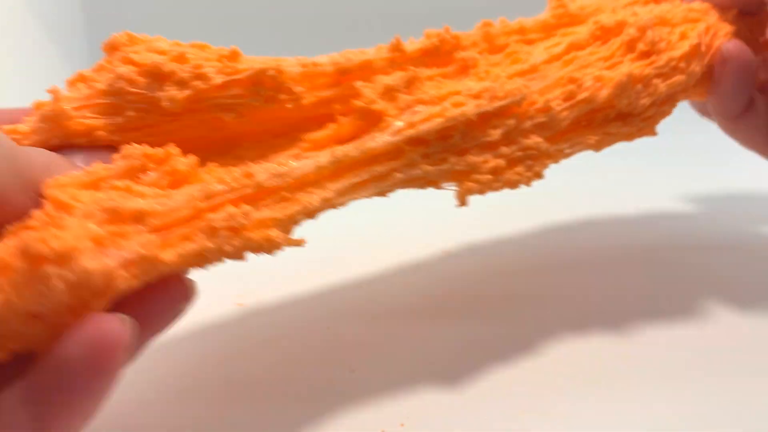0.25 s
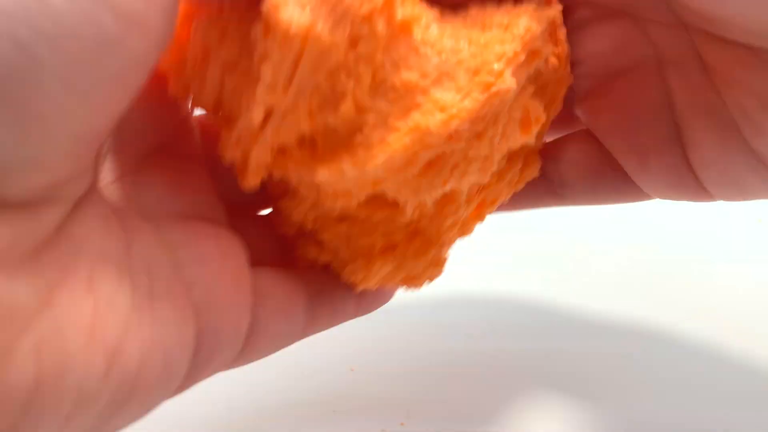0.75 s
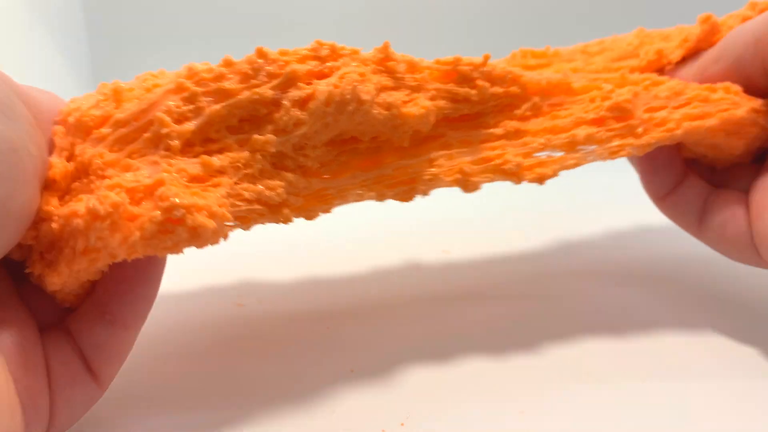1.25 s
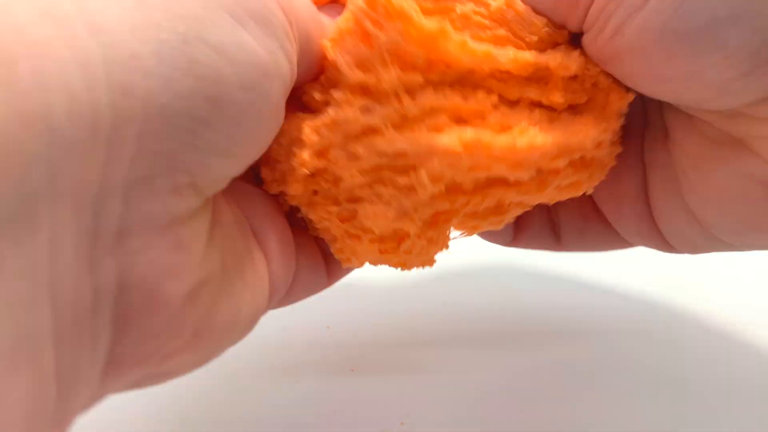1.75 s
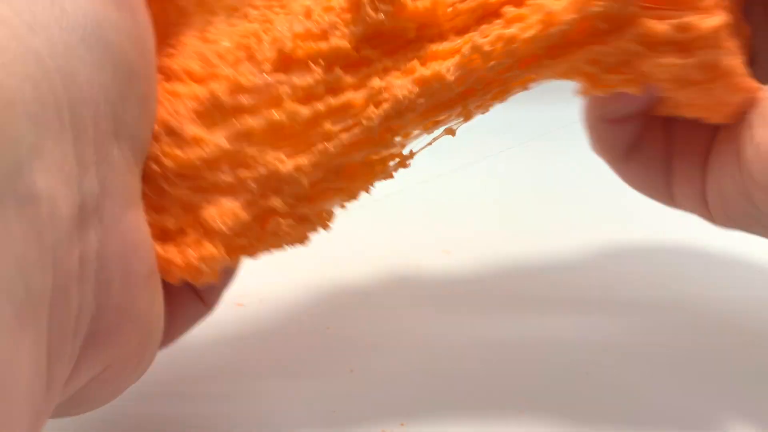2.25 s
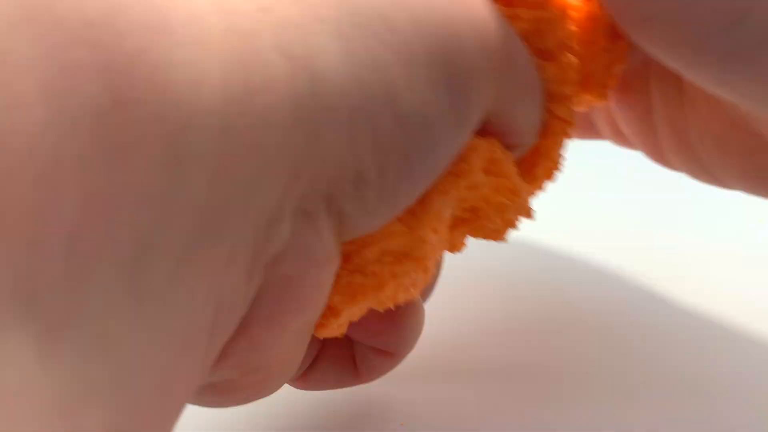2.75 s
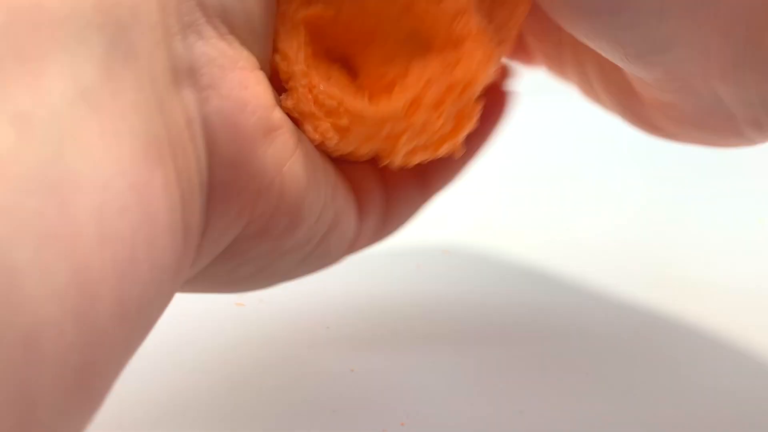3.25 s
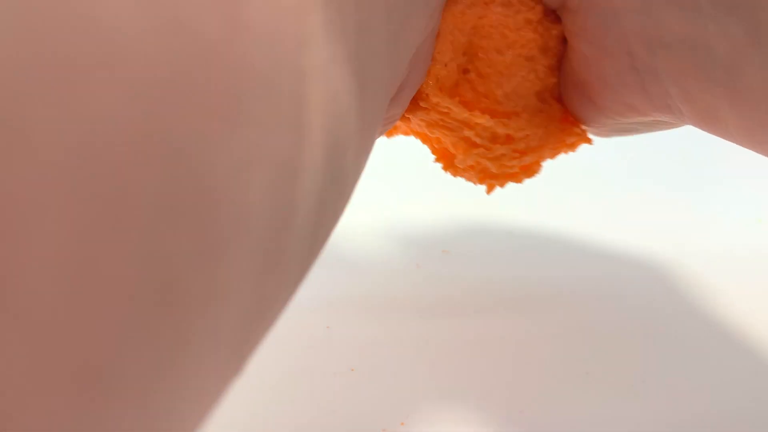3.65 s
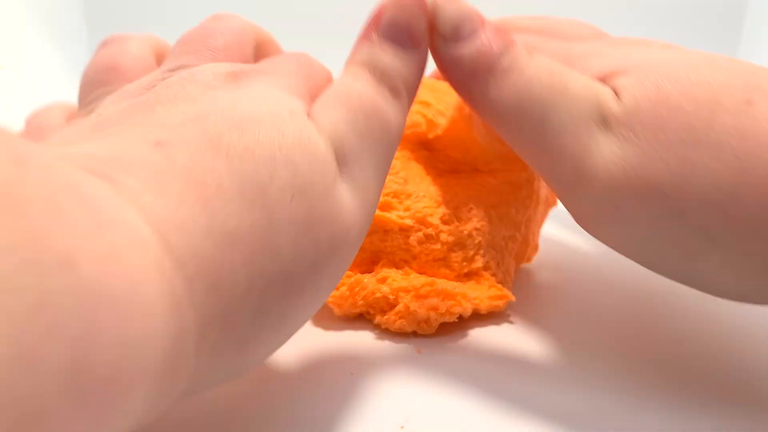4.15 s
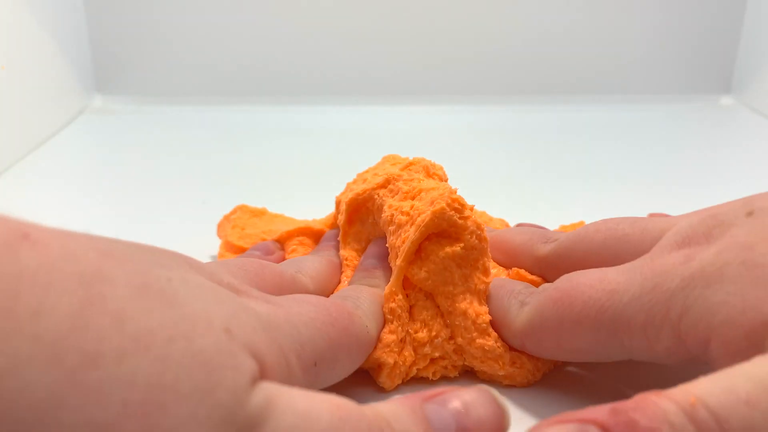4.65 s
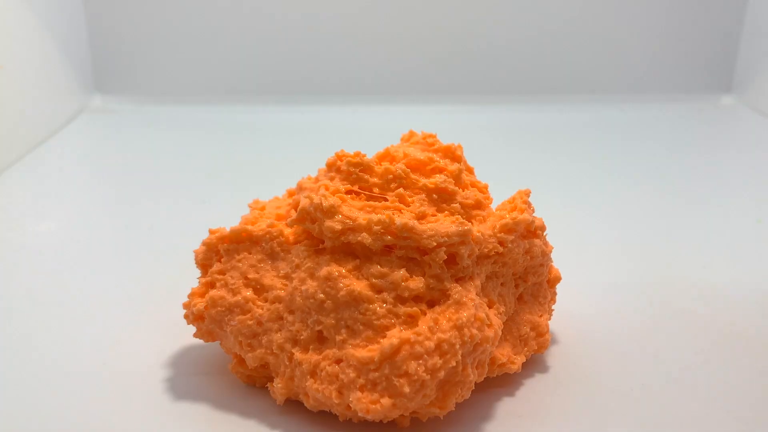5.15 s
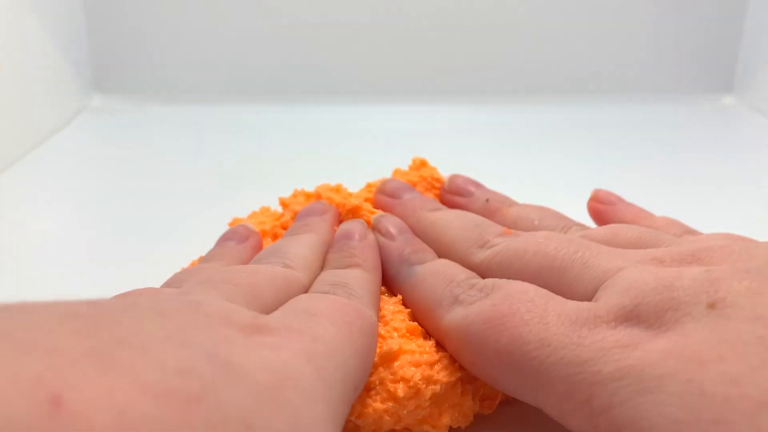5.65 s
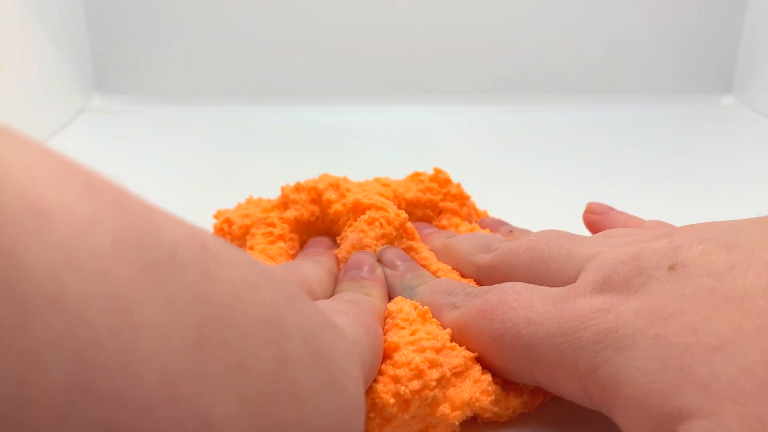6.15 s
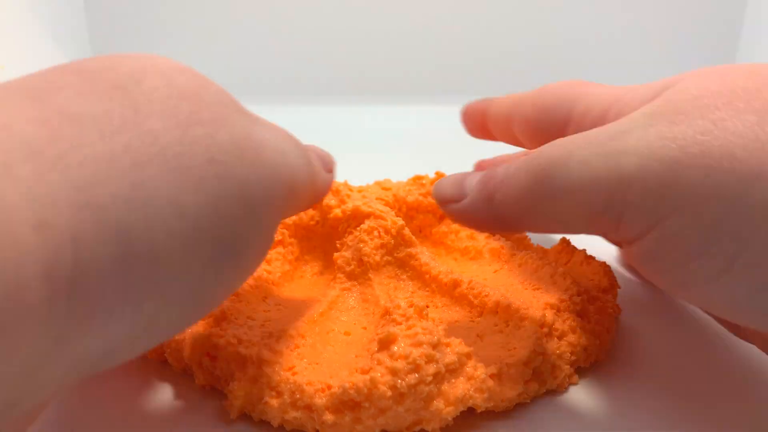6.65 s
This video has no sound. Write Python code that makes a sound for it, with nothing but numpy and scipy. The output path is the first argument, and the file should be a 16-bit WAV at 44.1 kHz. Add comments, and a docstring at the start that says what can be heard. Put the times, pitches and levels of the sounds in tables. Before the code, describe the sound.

Two hands pull, fold and squash crunchy foam-bead slime close to the microphone. Dense tiny crackles with sharp popping pockets swell and fade with each pull, strongest near the middle, where a deep soft thump hits the table. Later presses are wetter and lower, with dull rubbing and knocks, separated by brief quiet pauses. The space is small, dry and slightly boxy, with wide stereo detail.

```python
"""Inside a small box on a table, two hands stretch, fold and press a lump of bead-filled slime, in stereo.
Random snaps, each a short ringing sine, crackle densely; their low band squelches and their top fizzes.
Bigger pockets burst as ragged noise pops. Hands and lump knock and rub the table, whose modes thud.
Shaped noise lies below as a faint hum and hiss; box air, scatter and unlike paths to the sides add space."""
import sys
import numpy as np
from scipy import signal
from scipy.fft import rfft, irfft, next_fast_len
from scipy.io import wavfile

SR = 44100
rng = np.random.default_rng(int(sys.argv[2]) if len(sys.argv) > 2 else 0)


def master(y):
    """Save y as 16-bit WAV."""
    cut = np.clip(np.atleast_2d(y).T, -1, 1)
    pcm = np.round(cut * 32767)  # scale
    wavfile.write(sys.argv[1], SR, pcm.astype(np.int16))


N = 305172   # length in samples
PATHS = 3    # one common to both sides and one for each; same events, unlike fine detail


def amp(db):
    """Gain of a level in dB."""
    return 10 ** (np.asarray(db) / 20)


def rms_one(x):
    """Scale to rms 1."""
    return x / np.sqrt(np.mean(x ** 2) + 1e-20)


def at_hz(points, hz):
    """Read a table of f/Hz and value on a log-frequency axis."""
    table_hz, values = np.transpose(points)
    return np.interp(np.log(hz + 1), np.log(table_hz), values)


def colour(x, points):
    """Filter x by a gain curve of f/Hz and level/dB."""
    gain = amp(at_hz(points, np.fft.rfftfreq(N, 1 / SR)))
    return irfft(rfft(x) * gain, N)


def band(x, lo_hz, hi_hz):
    """Band-pass."""
    return signal.sosfilt(signal.butter(3, [lo_hz, hi_hz], "band", fs=SR, output="sos"), x)


def drift(rate_hz):
    """Random wander of rms 1: noise through two equal low-pass poles."""
    r = np.exp(-2 * np.pi * rate_hz / SR)
    settle = 9000   # samples dropped while the filter settles
    noise = rng.standard_normal(N + settle)
    return rms_one(signal.lfilter([1], [1, -2 * r, r * r], noise)[settle:])


def ring(clicks, hz, t60_s):
    """Two-pole resonator: a unit click sets a decaying sine of starting height 1 ringing."""
    r = amp(-60 / (t60_s * SR))
    w = 2 * np.pi * hz / SR
    return signal.lfilter([0, np.sin(w)], [1, -2 * r * np.cos(w), r * r], clicks + 1e-18)


def swell(peak_s, peak_db, rise_s, fall_s):
    """Level in dB of swells that rise to a peak and fall, 20 dB in the given times; their powers add."""
    t = np.arange(0, N / SR + .004, .002)[:, None]
    rising = (peak_s - t) / np.maximum(rise_s, .004)
    falling = (t - peak_s) / np.maximum(fall_s, .004)
    below = np.where(t < peak_s, rising, falling)
    power = np.sum(amp(peak_db - 20 * below) ** 2, axis=1)
    return np.interp(np.arange(N) / SR, t[:, 0], 10 * np.log10(power + 1e-14))


def joined(a_db, b_db):
    """Level in dB of two unrelated sounds together."""
    return 10 * np.log10(amp(a_db) ** 2 + amp(b_db) ** 2)


# Share of the sound that reaches the two sides by unlike paths: f/Hz, share (0-1)
DIFFUSE_SHARE = [(200, 0.06), (500, 0.31), (1000, 0.64), (2500, 0.67), (4000, 0.7), (6500, 0.85),
                 (8500, 0.02), (15000, 0)]


def box(paths):
    """Both sides hear the common path; each also hears a path of its own off walls and hands."""
    size = next_fast_len(N)
    share = np.clip(at_hz(DIFFUSE_SHARE, np.fft.rfftfreq(size, 1 / SR)), 0, 1)
    common, *own = rfft(paths, size)
    sides = common * np.sqrt(1 - share) + np.array(own) * np.sqrt(share)   # powers add to one
    return irfft(sides, size)[:, :N]


WALLS_T60_S, WALLS_DB = .035, -2.5   # decay of the scatter; its level against the direct sound


def walls(paths, count=40):
    """Quick noise-like scatter colours each path; it changes several times a second as the hands move."""
    hop = N // count + 1
    t = np.arange(2048) / SR
    size = next_fast_len(2 * hop + len(t))
    out = np.zeros((PATHS, (count + 4) * hop))
    padded = np.pad(paths, ((0, 0), (hop, 2 * hop)))
    fade = np.sin(np.pi * np.arange(2 * hop) / (2 * hop))   # overlapping pieces keep their power
    for k in range(count + 1):
        decay = amp(-60 * t / WALLS_T60_S)
        scatter = rms_one(rng.standard_normal((PATHS, len(t))) * decay) / np.sqrt(len(t))
        piece = padded[:, k * hop:(k + 2) * hop] * fade
        out[:, k * hop:k * hop + size] += irfft(rfft(piece, size) * rfft(scatter, size), size)
    return paths + amp(WALLS_DB) * out[:, hop:hop + N]


# Air modes of the box: f/Hz, width/Hz, level/dB against the direct sound
AIR_MODES = [(475.7, 44, -2.5), (906, 23, -1.5), (1252, 39, -2)]


def hollow(x):
    """The air in the box rings along at a few pitches: narrow resonances added to the sound."""
    air = 0
    for hz, width_hz, db in AIR_MODES:
        air = air + amp(db) * signal.lfilter(*signal.iirpeak(hz, hz / width_hz, SR), x)
    return x + air


# Spectrum of the hum and hiss: f/Hz, relative level/dB (per Hz)
HUSH_SPECTRUM = [(30, -23.5), (64, -8.5), (100, -18), (124, -5.5), (170, -18), (400, -28), (1100, -29.5),
                 (3600, -30.5), (7500, -33), (15500, -40.5)]
HUSH_DB = -73.5   # rms


def room_hush():
    """Steady noise, humped in the bass and thin above, makes the faint hum and hiss."""
    noise = rng.standard_normal((PATHS, N))
    return amp(HUSH_DB) * rms_one(colour(noise, HUSH_SPECTRUM))


# Modes of the table top: f/Hz, level/dB, t60/s (before damping by the contact)
TABLE_MODES = [(60, -4, 0.36), (93, -5, 0.3), (130.5, -0.5, 0.35), (209, 1.5, 0.1), (330, -30, 0.19),
               (412, -14, 0.36), (500, -26.5, 0.46)]
# Knocks, levels before trim: t/s, knock level/dB, rubbing level/dB,
# time for the rubbing to fall 20 dB/s (4 ms at least, negative values too)
KNOCKS = [(0.329, -56, -68, 0), (0.467, -59, -67, 0), (0.751, -59, -53.5, 0.1), (1.33, -60, -59, 0.2),
          (2.167, -92.5, -56, 0.28), (2.721, -44, -38, 0.5), (2.871, -69, -41.5, -0.48),
          (3.119, -37, -53, 0.5), (3.23, -41, -48, 0.8), (3.385, -36, -41.5, 0),
          (3.549, -21.5, -20.5, -0.01), (3.562, -15.5, -36, 0.12), (3.605, -30, -40, 0.08),
          (3.658, -42, -43, 0.2), (3.99, -52, -47, 0.05), (4.043, -49, -41.5, 0.15),
          (4.311, -47, -45.5, 0.26), (4.571, -37.5, -57, 0.47), (4.722, -51, -58, 0.22),
          (5.038, -40.5, -31.5, 0.04), (5.076, -34, -38.5, 0.02), (5.622, -45, -53.5, 0.24),
          (6.189, -64, -69, 0.5), (6.25, -45, -51, 0.26), (6.297, -47.5, -34.5, 0.03),
          (6.382, -52.5, -36, -0.33), (6.56, -52.5, -50.5, -1.35), (6.716, -32.5, -43.5, 0.26),
          (6.802, -51.5, -45, -0.5)]
RUB_LAG_S, RUB_RISE_S = .02, .035   # rubbing peaks after the knock; its rise spans 20 dB
KNOCK_TRIM_DB, RUB_TRIM_DB = -3.0, -2.5
KNOCK_DAMPING, RUB_DAMPING = 0.34, 0.3   # factors on each mode's t60


def table_thuds():
    """Soft knocks and the rubbing of the lump ring the table's modes."""
    knock_s, knock_db, rub_db, rub_fall_s = np.transpose(KNOCKS)
    rub_level_db = swell(knock_s + RUB_LAG_S, rub_db, RUB_RISE_S, rub_fall_s)
    knocks = np.zeros(N)
    knocks[[round(s * SR) for s in knock_s]] = amp(knock_db + KNOCK_TRIM_DB)
    rubbing = rng.standard_normal((PATHS, N)) * amp(3 * drift(18))   # uneven friction
    struck, rubbed = 0, 0
    for hz, db, t60_s in TABLE_MODES:
        struck = struck + amp(db) * ring(knocks, hz, KNOCK_DAMPING * t60_s)
        rubbed = rubbed + amp(db) * rms_one(ring(rubbing, hz, RUB_DAMPING * t60_s))
    soft = signal.butter(2, 500., fs=SR, output="sos")   # fleshy contact: no sharp edge
    return signal.sosfilt(soft, struck) + amp(rub_level_db + RUB_TRIM_DB) * rms_one(rubbed)


# Bursting pockets, levels before band trims: t/s, snap level/dB,
# body level/dB against the top, ragged tail level/dB against the snap
POPS = [(0.1599, -10.5, -17, -26), (0.413, -29, -11, -9), (0.423, -39, -16.0, -7), (0.5165, -36, 0, -9),
        (0.5264, -38, -5, -21), (0.6426, -29.5, -13, -37), (0.699, -42.0, -13.0, -10),
        (0.7226, -36, -1.5, -8), (0.76, -34, -11, 0), (0.7722, -23, -6, -9), (0.798, -27, -1, -13),
        (0.808, -29, -4, -3.5), (0.8981, -30, 0, -13), (0.9253, -30, -2, -13), (1.008, -33, -9, -4),
        (1.0861, -39, -11, -14), (1.108, -33, -6, -12), (1.126, -34, 1, -15), (1.249, -36, -2, -19),
        (1.264, -31, -3, -18), (1.313, -37, 2, -14), (1.4693, -46, 2.5, -9), (1.5968, -28, -19, -27),
        (1.676, -36, 3, -7.5), (1.8131, -39, -19, -13), (1.8643, -18.5, -13, -14), (1.8719, -21.5, -5, -18),
        (1.8814, -13.5, -11.5, -20), (1.894, -23, -1, -17), (1.9718, -23.5, -19, -12),
        (2.0317, -20.5, -8, -15), (2.0562, -25.5, -1.5, -5), (2.0894, -22, -12, -21), (2.11, -33, -6, -4),
        (2.173, -36.5, -8.5, 5), (2.2553, -22.5, -32, -4.5), (2.476, -26.5, -14.5, -8.5),
        (2.5619, -17.5, -16, -9.5), (2.566, -22, -24, -21.0), (2.59, -14.5, -19.5, -7),
        (2.6393, -25, -24, -10), (2.6481, -6.5, -18, -11.5), (2.6652, -12.5, -13.5, -6),
        (2.6846, -8, -25, -28), (2.697, -25, -5, -8.0), (2.7108, -4, -17.5, -14.5),
        (2.7193, -18.5, 1, -6.5), (2.7637, -30, -9, -21.0), (2.8, -23, -14.0, -20.0), (2.8184, -38, 2, -20),
        (2.834, -36, -16, -14), (2.8434, -16.5, -6, -24), (2.8516, -14.5, -7.5, -24),
        (2.9042, -16.5, -0.5, -27), (2.949, -21, -1.5, -4), (2.985, -15.5, -9, -0.5),
        (3.008, -19.5, -14, 3.5), (3.0405, -24, -16, -4.5), (3.0465, -7, -10.0, -2),
        (3.0798, -4.5, -16, -3.5), (3.188, -26, -24, -21.0), (3.237, -30, -6, -18.0), (3.318, -26, -9, -4),
        (3.4138, -42, -14.0, -4), (3.505, -29, -2.5, -2.5), (3.5457, -33, 13, -9), (3.565, -40, -7.0, -13),
        (3.5742, -20, -9, -10), (3.7038, -15.5, -18, -1.5), (3.727, -8, -15.5, -2),
        (3.7522, -11.5, 0, -4.5), (3.81, -21, -24, -22), (3.8298, -12.5, -8.5, -5),
        (3.92, -31.5, -5.5, -2.5), (4.2114, -36.5, -5, -3), (4.2392, -39, -15, -9),
        (4.2656, -48, -15, -13.5), (4.2907, -30.5, -9, -10.0), (4.408, -20, -8, -10),
        (4.4201, -25.5, -3.5, -9.5), (4.444, -21, -12.5, 2.5), (4.4961, -31, -15, -27),
        (4.51, -22, -13, -15.5), (4.5554, -33.5, 5.5, -7), (4.581, -36, 9, -11.5), (4.645, -37, 3, -12.5),
        (4.6304, -30, -0.5, -4), (4.7089, -30, -7, -3.5), (4.7297, -32, -8.5, 0.5),
        (4.793, -25.5, -14, -11.5), (4.841, -42, -4.0, -10.5), (4.8716, -31.5, -7, -9.5),
        (4.904, -41, -3, -16), (4.9157, -38.5, -7, -14.5), (4.9869, -39, -10.5, -0.5), (5.5707, -43, 1, -5),
        (5.5921, -31.5, -4, -4), (5.6258, -19, -7, -15), (5.643, -19, -9, -7.5), (5.678, -23, -2, -14.5),
        (5.7266, -26.5, -39, -16.5), (5.761, -41, -23, -13), (5.766, -32.5, -12.5, 1),
        (5.7828, -19, -23, -8), (5.868, -22, -15, -8.5), (5.8953, -31.5, 1.5, -11.5),
        (5.991, -32.5, -10, -2.5), (6.0587, -29, -7, -10.5), (6.0768, -29.0, -3.5, -9.5),
        (6.1654, -39, -15, -4), (6.177, -33, -8, -4.5), (6.2472, -16.5, -9.5, -10.5),
        (6.2716, -14.5, -23, -21.5), (6.2929, -31.5, -1.5, -7.5), (6.429, -57, -15, -5),
        (6.4356, -54.5, -9, -11), (6.541, -60, 3, -10), (6.764, -40, 7, -6)]
SNAP_T60_S, TAIL_T60_S, TAIL_RISE_S = 0.0035, 0.041, 0.0012
POP_TOP_TRIM_DB, POP_BODY_TRIM_DB = 1.6, 1.0


def pops():
    """A pocket tears open with a sharp snap of noise, then a ragged burst dies away."""
    t = np.arange(SR // 10) / SR
    top, body = np.zeros((2, PATHS, N + len(t)))
    flutter = amp(0.79 * drift(500)[np.arange(N + len(t)) % N])
    ragged = rms_one(rng.standard_normal(top.shape) * flutter)
    tear = rng.choice([-1, 1], top.shape)
    snap = amp(-60 * t / SNAP_T60_S)
    tail = amp(-60 * t / TAIL_T60_S) * np.minimum(t / TAIL_RISE_S, 1)
    for s, snap_db, body_db, tail_db in POPS:
        i = round(s * SR)
        span = slice(i, i + len(t))
        burst = amp(snap_db) * (snap * tear[:, span] + amp(tail_db) * tail * ragged[:, span])
        top[:, span] += burst
        body[:, span] += burst * amp(body_db)
    bright = amp(POP_TOP_TRIM_DB) * band(top[:, :N], 8220, 15600)
    return bright + amp(POP_BODY_TRIM_DB) * band(body[:, :N], 800, 7100)


def grains(per_s, spread_db, cycles, clump_db, count=16):
    """Tiny pockets snap at random, in clumps; each rings a cycle or so at a pitch drawn by chance."""
    sizes = amp(spread_db * np.minimum(rng.exponential(1, N), 5)) * rng.choice([-1, 1], (PATHS, N))
    clumps = amp(clump_db * (drift(23) + 1.4 * drift(100)))
    snaps = sizes * (rng.random(N) < per_s / SR) * clumps
    dealt = rng.integers(0, count, N)   # which pitch each snap gets
    total = 0
    for k, hz in enumerate(np.geomspace(300, 16000, count)):
        total = total + rms_one(ring(snaps * (dealt == k), hz, cycles / hz)) * np.sqrt(hz)
    return rms_one(total)


# Slime creeping and stretching between the squeezes, before band trims: t/s, crackle level/dB
CREEP = [(0.0, -48.5), (0.2, -51), (0.3, -62.5), (0.58, -69.5), (0.72, -57), (0.95, -50.5), (1.27, -53.5),
         (1.45, -68.5), (1.64, -52), (1.85, -47), (1.95, -60.5), (2.45, -64.5), (2.65, -52), (3.1, -66),
         (3.42, -76), (3.7, -45.5), (3.84, -67), (4.25, -63), (4.46, -50.5), (4.94, -63), (5.1, -95.5),
         (5.52, -94), (5.57, -55), (5.76, -58), (5.87, -51.5), (6.2, -61.5), (6.42, -91.5), (6.52, -87.5),
         (6.62, -60.5), (6.7, -71), (6.92, -70.5)]
CREEP_SQUELCH_DB = -7.5   # wet low part against the crackle, before band trims
# Squeezes, folds and presses, before band trims: peak t/s, crackle level/dB, rise time/s, fall time/s,
# squelch level/dB against the crackle; rise and fall span 20 dB
SQUEEZES = [(0.329, -48, 0.09, 0.065, -5.5), (0.43, -53, 0.09, 0.15, -5), (0.772, -45, 0.046, 0.35, -3.5),
            (1.318, -44.5, 0.033, 0.096, -2), (1.361, -41, 0.06, 0.018, -3),
            (1.904, -45.5, 0.036, 0.05, -8.5), (2.041, -45.5, 0.056, 0.29, -8.5),
            (2.246, -51, 0.13, 0.14, 2.5), (2.563, -59.5, 0.13, 0.16, 7), (2.722, -40, 0.054, 0.12, -3.5),
            (2.89, -39.5, 0.069, 0.45, -20), (2.983, -45, 0.23, 0.026, 9), (3.05, -30, 0.032, 0.032, -17),
            (3.65, -41, 0.049, 0.12, -26), (3.132, -40, 0.073, 0.032, -7), (3.237, -47, 0.085, 0.22, 1.5),
            (3.318, -44, 0.14, 0.044, 2.5), (3.558, -40, 0.12, 0.3, -4.5), (3.76, -34.5, .1, 0.067, -11),
            (3.831, -40.5, 0.0035, 0.065, -19), (4.046, -43.5, 0.14, 0.28, 1),
            (4.35, -47.5, 0.078, 0.16, 0.5), (4.58, -54.5, 0.057, 0.43, -2.5),
            (5.047, -35, 0.054, 0.034, 3), (5.643, -39.5, 0.06, 0.067, -4), (6.0, -53.5, 0.017, 0.093, -6),
            (6.25, -40.5, 0.024, 0.066, 7.5), (6.309, -41, 0.054, 0.055, 10), (6.358, -43.5, 0.11, 0.02, 4),
            (6.77, -47, 0.045, 0.071, -6.5), (6.819, -46, 0.096, 0.2, 3)]


def kneading():
    """Crackle and squelch levels in dB: creeping and squeezes add in power."""
    creep_db = np.interp(np.arange(N) / SR, *np.transpose(CREEP))
    peak_s, squeeze_db, rise_s, fall_s, wet_db = np.transpose(SQUEEZES)
    crackle_db = joined(creep_db, swell(peak_s, squeeze_db, rise_s, fall_s))
    wet_swell_db = swell(peak_s, squeeze_db + wet_db, rise_s, fall_s)
    return crackle_db, joined(creep_db + CREEP_SQUELCH_DB, wet_swell_db)


# Tone curve of the crackle: f/Hz, gain level/dB
CRACKLE_TONE = [(250, -4.5), (500, 4.5), (900, 3.5), (1600, 1.5), (2500, -1), (4200, 0.5), (6000, -2),
                (8000, 0.5), (12000, 3.5), (15500, 1.5)]
# Fine fizz against the crackle, before band trims: t/s, level/dB
FIZZ = [(0.0, 2), (1.3, 2), (1.45, 11.5), (1.62, -1.5), (1.9, 1), (1.96, 12.5), (2.05, 0), (2.2, 5),
        (2.3, 14), (2.7, 16.5), (2.8, 0), (3.07, 13), (3.14, -3), (3.3, 7.5), (3.5, -1.5), (3.7, 9),
        (3.9, 6.5), (4.2, 2.5), (5.1, 0.5), (5.64, 3), (5.76, 16), (5.88, 3.5), (6.2, 0), (6.28, 11.5),
        (6.4, -1), (6.92, 1)]
FIZZ_SMOOTH = 0.4   # power share of the fizz too fine to hear as single snaps
SQUELCH_TRIM_DB, MIDDLE_TRIM_DB, FIZZ_TRIM_DB = -5.5, -.5, -1.0


def crackle():
    """One stream of snaps; its wet low part, its middle and its fine top follow the kneading."""
    crackle_db, squelch_db = kneading()
    fizz_db = np.interp(np.arange(N) / SR, *np.transpose(FIZZ))
    snaps = colour(grains(per_s=6000., spread_db=2.5, cycles=1.1, clump_db=1.02), CRACKLE_TONE)
    squelch = amp(squelch_db + SQUELCH_TRIM_DB) * rms_one(band(snaps, 200, 1600))
    middle = amp(crackle_db + MIDDLE_TRIM_DB) * rms_one(band(snaps, 1724, 7300))
    smooth = rms_one(colour(rng.standard_normal(snaps.shape), CRACKLE_TONE))
    fine = np.sqrt(1 - FIZZ_SMOOTH) * rms_one(snaps) + np.sqrt(FIZZ_SMOOTH) * smooth
    fizz = amp(crackle_db + fizz_db + FIZZ_TRIM_DB) * rms_one(band(fine, 8420, 15000))
    return squelch + middle + fizz


def scene():
    """Slime rings the box air and scatters off its walls; table and hush join on the way to the sides."""
    slime = walls(hollow(crackle() + pops()))
    return box(slime + table_thuds() + room_hush())


IN_PHASE_HZ, TURN_HZ = 10150, 3150   # sides agree here, and slip one full cycle per this many Hz
BASS_CUT_HZ, TOP_HZ, STOP_HZ = 47, 15750, 16739   # top steps down 24 dB from TOP_HZ, 50 dB from STOP_HZ


def record(dry):
    """Left lags right by a third of a millisecond above the bass; deep bass and extreme treble are cut."""
    size = next_fast_len(N + 64)
    hz = np.fft.rfftfreq(size, 1 / SR)
    slip = 2 * np.pi * np.maximum((hz - IN_PHASE_HZ) / TURN_HZ + 3, 0)   # no slip below 700 Hz
    top_step = amp(-24 * np.clip((hz - TOP_HZ) / 150, 0, 1))
    response = np.exp(-1j * slip * [[1], [0]]) * top_step
    pair = irfft(rfft(dry, size) * response, size)[:, :N]
    pair = signal.sosfilt(signal.butter(4, BASS_CUT_HZ, "high", fs=SR, output="sos"), pair)
    return signal.sosfilt(signal.cheby2(12, 50, STOP_HZ, fs=SR, output="sos"), pair)


dry = scene()
out = record(dry)
master(out)
```